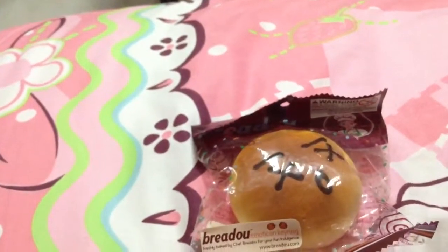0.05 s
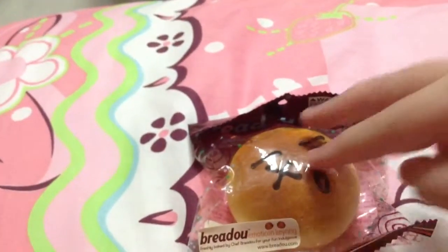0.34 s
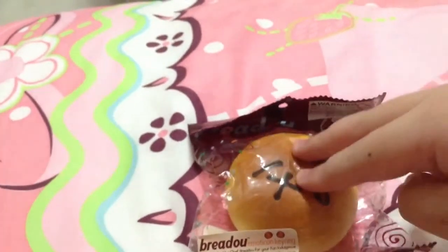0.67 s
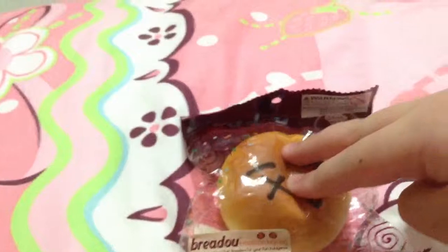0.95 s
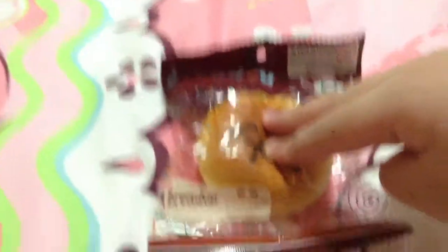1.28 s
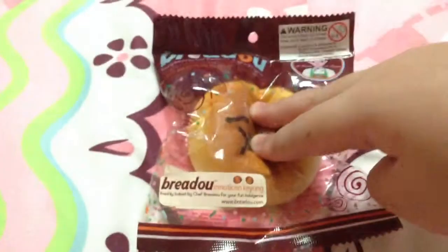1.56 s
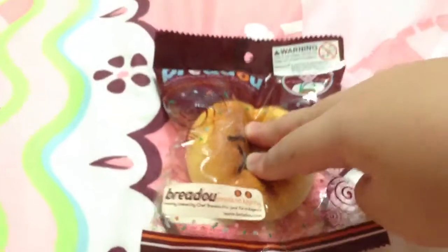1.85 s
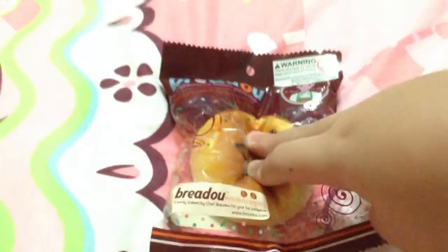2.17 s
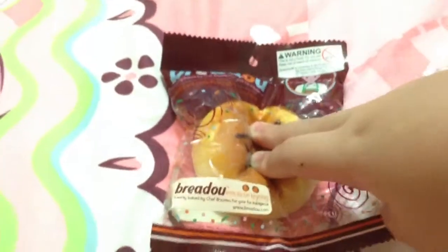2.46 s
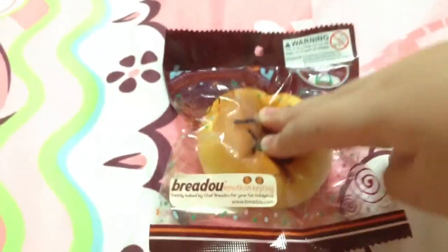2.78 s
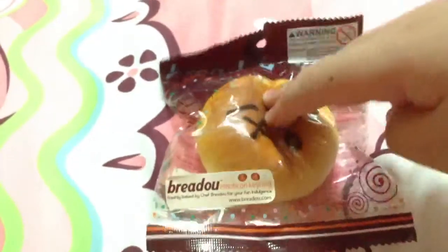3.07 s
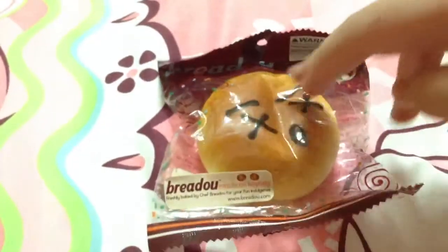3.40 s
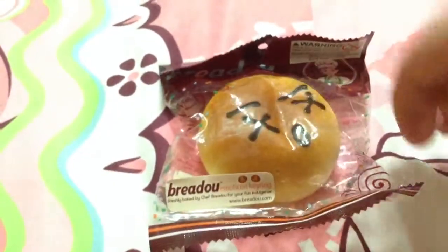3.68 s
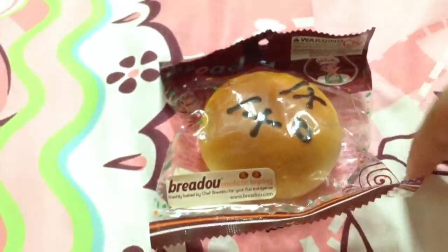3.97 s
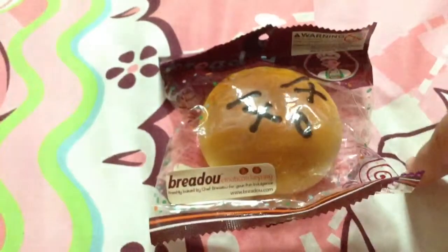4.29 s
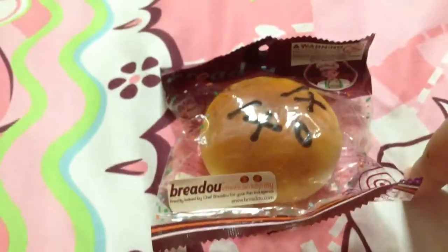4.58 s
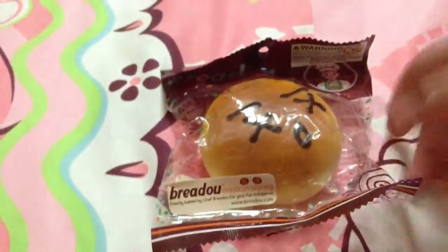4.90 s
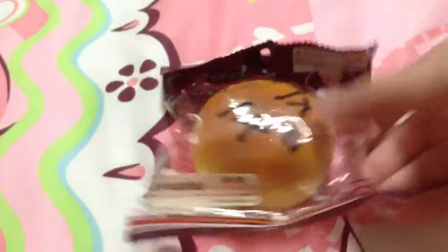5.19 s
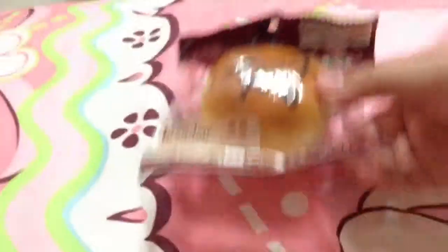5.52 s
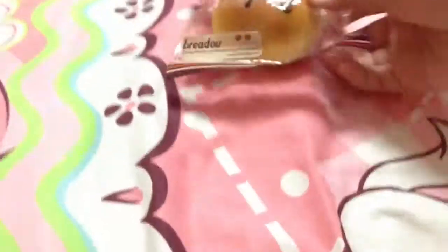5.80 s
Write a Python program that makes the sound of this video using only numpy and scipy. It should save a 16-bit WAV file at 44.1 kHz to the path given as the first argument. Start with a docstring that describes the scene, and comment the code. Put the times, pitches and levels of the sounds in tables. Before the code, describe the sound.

Close, sharp crackles and small thumps come from a plastic packet pressed and released around a soft toy, ending in a faint slide.

```python
"""Squeezing a foam toy in its packet

Fingers press a foam toy in its plastic packet on a cloth-covered table, let it swell back, then slide
the packet away. Creases in the film flip with sharp snaps among finer crackle, and broad panels pop
through with a soft thump. The film ticks as it peels from the foam, and the packet hisses over the
cloth. A small room echoes, and the loudest snaps overload the nearby microphone."""
import sys
import numpy as np
from scipy import signal
from scipy.fft import rfft, irfft
from scipy.io import wavfile
from scipy.ndimage import uniform_filter1d

SR = 44100
rng = np.random.default_rng(int(sys.argv[2]) if len(sys.argv) > 2 else 0)


def dump_mix(stems):
    """Bounce the given channels to the path in sys.argv[1] as a 16-bit WAV at rate SR."""
    frames = np.atleast_2d(stems).T  # one column per channel
    limited = np.clip(frames, -1, 1)  # hard clip at full scale
    pcm = np.round(limited * 32767).astype(np.int16)
    wavfile.write(sys.argv[1], SR, pcm)


N = 266805
TOP_HZ = 15450  # upper edge of the treble


def crease_snaps(crack_s=0.00024, rattle_s=0.0018, linger=0.04, linger_s=0.0057,
                 creak=0.21, creak_s=0.00022, ring_width=0.16, damping_hz=60, ripple_db=3, blur=0.43):
    """A crease creaks, cracks and leaves the film rattling. Returns the near sound and the room feed."""
    # One crease flipping: (time [s], level over 4 ms [dB], ring pitch [Hz], ring boost [dB], body [dB],
    # edge [dB], sheen [dB], share of the energy in the first crack [0-1], feed to the room [dB])
    flips = [(0.0518, -25.5, 1180, 14, -10, -6, -0.5, 0.95, -16.5),
             (0.1299, -27, 1520, 7.2, -9, -5, 3.5, 0.87, -21), (0.489, -50, 1260, 3, 14, 3, 19, 0.45, -13),
             (0.5906, -40.5, 2720, 16, 18, 28, 34, 0.75, -20), (0.667, -43, 2870, 9, 16, 1, 26, 0.7, -13),
             (0.857, -37, 3710, 11, 9.5, -23, -8.5, 0.5, -8),
             (0.8884, -38, 3900, 13, 10, -17, -10, 0.49, -9),
             (0.9136, -32, 720, 12, 3.5, -4, -11, 0.25, -19), (0.9424, -48.8, 970, 4, 3, -2, 7, 0.53, -13),
             (0.9654, -27, 2690, 20, 13.5, 11, 15, 0.53, -13),
             (0.9977, -22.5, 725, 6.6, -4.5, -1.5, -5.5, 0.23, -19.5),
             (1.0737, -27.5, 1050, 15, -2, -4, -3, 1, -16),
             (1.0979, -36, 2870, 15, 26, -1.5, 0.5, 0.33, -20),
             (1.146, -31, 5600, 8, 16.5, -9.5, -4, 0.51, -34),
             (1.1557, -34.5, 3880, 10, 20, -1, -0.5, 0.41, -15),
             (1.18, -44.5, 1190, 4.4, 20, -14, -12, 0.45, -15.5),
             (1.1875, -31.5, 790, 9, -7, -7, -11, 0.48, -23.5),
             (1.2096, -13.5, 1480, 10.5, -10.5, -1, 5.5, 0.88, -16),
             (1.2149, -20, 3600, 19.3, 13.5, 11, 12.5, 1, -15.5),
             (1.2424, -32, 3520, 14, 18, 3.5, 5.5, 0.45, -16.5),
             (1.2637, -21, 710, 16.3, -13.5, -11.5, -14, 0.81, -14.5),
             (1.2866, -34, 1140, 20, -21, -9, -16, 0.45, -17.5),
             (1.2931, -24.5, 3020, 12, 28.5, 14, 17, 0.39, -20),
             (1.3206, -21, 3520, 13, -4, 8, 21, 1, -18.5), (1.327, -16, 3280, 8.6, 0.5, 1.5, 4, 0.86, -32),
             (1.3548, -27, 5320, 8, 10.5, -5.5, -12, 0.32, -15),
             (1.3832, -24, 1320, 12, -8, 2, -1, 0.97, -17),
             (1.4025, -28.5, 3340, 12, 9, -8, -5.5, 0.51, -22),
             (1.4083, -27, 910, 10, 12, -2.5, 3.5, 0.37, -6),
             (1.4295, -15, 3270, 12, 10.5, -2, 0.5, 0.64, -22),
             (1.4541, -31, 2720, 12, 14, -1, 14, 0.72, -19),
             (1.4616, -16.5, 3020, 9.5, -1, -1, 4.5, 0.7, -27.5),
             (1.4709, -22, 2720, 7, -11, 0, 2, 0.21, -22.5),
             (1.4747, -15.5, 3250, 15, 16, 11.5, 15, 0.79, -12.5),
             (1.508, -24, 5570, 7.6, 8, -17, -12.5, 0.22, -11),
             (1.5614, -17.6, 716, 6, -24, 0.5, 4, 0.54, -6), (1.6398, -25, 1800, 5.3, 5, 0, -2, 0.83, -31),
             (1.6503, -24, 1640, 9, 3, -6, -4, 0.38, -20), (1.6658, -31, 2330, 5.8, 7, -3, -12, 0.45, -15),
             (1.6697, -28, 1640, 14, -8, -22, -14, 0.47, -19),
             (1.695, -33.5, 1630, 17, -8, 1, -17, 0.72, -9), (1.7158, -32, 2580, 12, 18, 3, -4, 0.83, -6),
             (1.7215, -21.5, 1400, 6.8, -11, -9, -15, 0.62, -27),
             (1.7343, -18, 1800, 12, -4, -3.5, -13.5, 0.45, -20.5),
             (1.7569, -27.0, 1700, 12, 8, 17, 1.5, 0.92, -18.5),
             (1.8177, -16.7, 1680, 3, 2.5, -6, -25, 0.5, -22),
             (1.8314, -32.5, 750, 10, 2, -6, -12.5, 0.53, -13.5),
             (1.8999, -29, 1900, 3, 8, -13.5, -23, 0.57, -28),
             (1.9197, -13.5, 5430, 5.7, 2, -10, -2, 0.84, -14.5),
             (1.9314, -23.5, 750, 4.8, 3, -6, -4.5, 0.57, -17.5),
             (1.9858, -26, 3520, 13, 16.5, 12, 8, 0.59, -17.5),
             (1.9927, -14.5, 2740, 13, 21, 13, 18, 1, -16.5),
             (2.0431, -15.0, 1600, 10.4, 8.5, 10, -3.5, 0.77, -22.5),
             (2.0785, -15, 3160, 13.6, 0, 9.5, 3, 1, -10),
             (2.1072, -27.5, 1700, 12, -25, -12, -26, 0.37, -11),
             (2.1586, -23, 1310, 11, -20, -15, -20, 0.46, -14.5),
             (2.1627, -17.5, 1630, 5.4, 4, 5.5, -0.5, 0.88, -23),
             (2.1746, -13, 3000, 9.9, 7, 5, 3, 0.9, -20),
             (2.1967, -16.5, 2000, 6.9, 3, -7, -4.5, 0.63, -10),
             (2.4647, -35.9, 1790, 19.6, 12.5, -18, -18, 0.8, -21),
             (2.5161, -37.5, 5600, 12, -17.5, -46, -33, 0.42, -15.5),
             (2.5292, -44, 2210, 12, -3, -23, -18, 0.44, -10),
             (2.566, -29.2, 1510, 15, -6, -40, -37, 0.35, -17),
             (2.5881, -16.0, 5440, 10, -1, -1, -1.5, 0.58, -20.5),
             (2.598, -34, 750, 13, -3.5, -20, -25, 0.31, -5.5),
             (2.6128, -16, 1860, 8.9, -8.5, -0.5, -8.5, 0.23, -23),
             (2.6601, -27.5, 1800, 12, 5, 9, -7, 0.79, -21.5),
             (2.6756, -20.5, 2020, 12, -1.5, -1.5, -13, 0.22, -25),
             (2.6914, -39.0, 1800, 8.3, 27, -1, 4, 0.45, -15),
             (2.6961, -31.5, 3180, 18, 11, 6, 7, 0.98, -23),
             (2.709, -18, 710, 17.4, -6, 7, 1.5, 0.92, -21.5),
             (2.7426, -32.5, 1120, 4.6, -2, -5.5, -23.5, 0.56, -18.5),
             (2.7551, -25.5, 3900, 3, 6, -7, -26, 0.8, -17),
             (2.7668, -28, 3700, 11, 7, -15.5, -28, 0.73, -18),
             (2.7704, -35, 3710, 6, 15, -17, -24.5, 0.41, -13),
             (2.7802, -33.5, 830, 11, 5, -14, -33, 0.68, -18.5),
             (2.79, -39, 2870, 14, 10, -12, -21, 0.67, -6), (2.8, -30.5, 2050, 11, 11, 5.5, -2, 0.61, -4.5),
             (2.8042, -17.5, 3520, 14.6, 12, -3, -5, 0.24, -18),
             (2.823, -15.5, 920, 11, -18, -2.5, -3, 0.47, -24),
             (2.8315, -24, 2780, 11, -1, -8, 2, 0.49, -14.5), (2.8367, -17, 2870, 6.2, 5, 1, 3, 0.63, -11),
             (2.8512, -23.5, 3340, 10, 15, -3.5, 4, 0.5, -16),
             (2.8609, -12.5, 4160, 5, 4, 5.5, 4, 0.9, -30), (2.8966, -17, 2530, 19, 16, 15, 17, 0.78, -18),
             (2.907, -29, 4330, 6.7, 12, 2.5, -1, 0.26, -10), (2.9161, -27, 3340, 13, 8, 4, 8, 0.74, -18.5),
             (2.9265, -32.8, 3710, 11, 14, 5, 2.5, 0.45, -16),
             (2.9498, -24.5, 3220, 13, 11, 2, -10, 0.29, -18),
             (2.9564, -17, 750, 10.3, 3, -3, -3, 0.6, -21),
             (2.9879, -18, 746, 11, -15, -15.5, -15, 0.26, -18.5),
             (2.9964, -27.5, 3500, 23, 19, 2, -4, 0.61, -21),
             (3.006, -19.5, 750, 5.7, -6.5, -2.5, -4.5, 0.56, -20),
             (3.0355, -31, 3180, 17, 19, 3, -11, 0.74, -9),
             (3.0509, -19.5, 1470, 4, 7.5, 4, 0.5, 0.4, -16.5),
             (3.0596, -15.5, 3400, 9.8, 7, -1, 2, 0.32, -28),
             (3.0981, -12.5, 3180, 10.3, -2, 6.5, 6.5, 0.9, -20),
             (3.1243, -32.4, 1630, 4.9, -3, 1, -4, 0.41, -7.5), (3.1335, -25, 3520, 5, 9, 5, 2, 0.82, -18),
             (3.155, -34, 746, 13, -5, -15, -11, 0.5, -17),
             (3.1942, -37.1, 3340, 14, 13, -6, -15, 0.35, -22),
             (3.2018, -24.5, 4330, 10.6, 6, 2, 7, 0.92, -32),
             (3.2358, -14.5, 3240, 17, 19.5, 14, 9.5, 0.7, -21.5),
             (3.256, -38.9, 2870, 13, 14, 2, -1, 0.45, -15),
             (3.287, -21, 4110, 8, 13, -4.5, 3.5, 0.72, -26.5),
             (3.358, -29, 4330, 3, 13, -14, -19, 0.58, -15),
             (3.3612, -21.5, 4560, 2.2, 14.5, -5, -8, 0.48, -21.5),
             (3.3782, -29.5, 1630, 5, 5, -2.5, -9, 0.71, -26),
             (3.3999, -17, 3000, 8.7, 1, -7.5, -6, 0.77, -16), (3.557, -35, 755, 3, -1, 5.5, 21, 0.66, -16),
             (3.5848, -47.5, 2580, 7, 5, 5, 22, 0.73, -8), (3.62, -48.5, 2580, 10, 21, 8, 15, 0.92, -17),
             (3.6442, -45.5, 1260, 3, 3, -1, 15, 0.82, -13.5),
             (3.6823, -30.2, 3280, 5.6, -2, -21.5, -14.5, 0.5, -3),
             (3.6935, -14.5, 3020, 10, -7.5, -15.5, -11.5, 0.88, -30),
             (3.7804, -21.5, 1380, 13.4, -11.5, 3.5, 0, 0.75, -23.5),
             (3.9582, -25, 3470, 19.4, 23, 13, 6, 0.35, -15),
             (3.9598, -19.0, 1140, 15, 6.5, 2.5, 1, 0.41, -19.5),
             (3.9865, -33.5, 750, 5, 3, -13, -21, 0.57, -12.5),
             (3.9981, -10, 3500, 9.5, -1, 9.5, 11, 0.94, -17.5),
             (4.0761, -21.5, 1300, 9.1, -10, -6.5, -16, 0.82, -21.5),
             (4.1925, -29, 800, 17, -7, -14, -17, 0.68, -14),
             (4.1984, -20.5, 3740, 16, 14.5, 1.5, -1, 0.18, -18),
             (4.2621, -16, 3300, 6.2, 10, 3, 2.5, 0.65, -17.5),
             (4.3306, -41.1, 2100, 4, -2, -11, -12, 0.46, -21),
             (4.534, -48.5, 2720, 13, 10, 6, 20, 0.45, -13),
             (5.1383, -25, 1170, 15.3, -7, -3, 0, 0.74, -17), (5.2554, -35.5, 1900, 4, 11, 2, 9, 0.53, -9),
             (5.2873, -17.5, 3200, 11.3, 8, 19.5, 13, 0.76, -14),
             (5.3658, -32.0, 5000, 14, -1, -10.5, -12, 0.57, -14),
             (5.396, -17.5, 3450, 15.4, -7, 10, 11.5, 0.83, -18),
             (5.3984, -22, 3740, 10, -9, -2, 3, 0.18, -25),
             (5.5354, -51.6, 1320, 11, 11, -12, -8, 0.54, -6),
             (5.5789, -25, 3560, 10, 4.5, 6.5, 6, 0.25, -15.5),
             (5.8304, -43.5, 1080, 9, -11, -16, -21, 0.63, -8),
             (5.8631, -42.3, 1800, 18, -15, -13, -14, 0.44, -22),
             (6.0339, -40.5, 3630, 13, 5, 5, -2, 0.63, -7)]
    # Where body, middle (held at 0 dB), edge and sheen lie: (frequency [Hz])
    tone_hz = [1000, 2700, 6500, 12000]
    # How well the film gives off sound: (frequency [Hz], gain [dB])
    film_tone = [(40, -37), (110, -38), (190, -7), (450, -9), (750, 0.5), (15000, 0)]
    size, lead, level_span = 1024, 88, 176  # in samples
    t = (np.arange(size) - lead) / SR
    hz = np.fft.rfftfreq(size, 1 / SR)
    age = abs(t)
    crack = unit((t >= 0) * np.exp(-age / crack_s))
    dying_away = np.exp(-age / rattle_s) + linger * np.exp(-age / linger_s)
    rattle = unit(np.where(t < 0, creak * np.exp(-age / creak_s), dying_away))
    near, far = np.zeros((2, N))
    for s, db, ring_hz, ring_db, body_db, edge_db, sheen_db, share, room_db in flips:
        share = np.clip(share, 0.05, 0.95)
        envelope = np.sqrt(share * crack ** 2 + (1 - share) * rattle ** 2)
        burst = rfft(rng.standard_normal(size) * envelope)
        # Even out the burst, so that the ringing patch of film sets the tone.
        uneven_db = 10 * np.log10(uniform_filter1d(abs(burst) ** 2, size=25))
        tone_db = at_hz(list(zip(tone_hz, [body_db, 0, edge_db, sheen_db])), hz)
        patch_db = ring_db / (1 + ((hz - ring_hz) / (ring_width * ring_hz + damping_hz)) ** 2)
        colour_db = at_hz(film_tone, hz) + tone_db + patch_db - uneven_db
        # Sound from two parts of the film adds and cancels, rippling each snap's treble differently.
        lag_s, phase = rng.uniform(0.00015, 0.0005), rng.random()
        comb_db = ripple_db * np.minimum(hz / tone_hz[2], 1) * np.cos(2 * np.pi * (hz * lag_s + phase))
        direct = unit(irfft(burst * ringing_filter(colour_db + comb_db)))
        # The room gathers sound from all directions, which softens the ring.
        scattered = unit(irfft(burst * ringing_filter(colour_db - blur * patch_db)))
        gain = amp(db) * np.sqrt(level_span / size)
        add(near, s + t[0], gain * direct)
        add(far, s + t[0], gain * amp(room_db) * scattered)
    return near, far


def panel_pops(rise_s=0.0001, bass_cut_hz=160, leak_db=-24):
    """A panel pushes the air once; the microphone's bass cut turns most of that into a brief swing."""
    # A broad panel of film popping through: (time [s], strength of the push [dB], fade time [s])
    panels = [(1.295, -23.5, 0.00077), (1.402, -25.5, 0.0011), (1.4298, -12, 0.00088),
              (1.4531, -20, 0.0012), (1.4707, -21, 0.0012), (1.4748, -4, .0012), (1.5076, -9.5, 0.00085),
              (1.562, -4, 0.0017), (1.8171, -16, 0.00057), (1.9202, -5, .0015), (1.9316, -10.5, 0.0014),
              (1.9923, -5, 0.0012), (2.0792, -15.5, 0.0012), (2.1747, -2.5, .0015), (2.196, -13.5, .001),
              (2.8079, -23, 0.0015), (2.851, -19.5, 0.0013), (2.864, -23.5, .001), (2.9568, -21, .001),
              (3.0049, -21, .003), (3.0109, -19.5, .003), (3.0604, -15, 0.00086), (3.1391, -19, 0.00096),
              (3.162, -23, 0.0012), (3.2362, -1.5, 0.0016), (3.2874, -9.5, 0.0013), (3.361, -1, 0.0011),
              (3.9992, -21, 0.0018), (5.2862, -32, 0.0044)]
    t = np.arange(1024) / SR
    pushes = np.zeros(N)
    for s, db, fade_s in panels:
        add(pushes, s, amp(db) * np.exp(-t / fade_s) * (1 - np.exp(-t / rise_s)))
    bass_cut = signal.butter(4, bass_cut_hz, "high", fs=SR, output="sos")
    return signal.sosfilt(bass_cut, pushes) + amp(leak_db) * pushes


def fine_crackle(per_s=200, spread_db=6, decay_s=0.001, scratch_mix=0.78, level_db=-2,
                 stiffness=0.74, firm_db=-46, clump=0.8, pitches=28):
    """Many tiny creases flip; a light touch favours the smallest, highest-pitched patches of film."""
    # How hard the fingers work the film: (time [s], strength [dB])
    effort = [(0, -80), (.45, -70), (.52, -64), (.8, -64), (.9, -53), (1.1, -52), (1.25, -44), (1.45, -42),
              (1.55, -52), (1.68, -45), (1.79, -61), (1.88, -56), (2.0, -56), (2.15, -51), (2.25, -78),
              (2.5, -63), (2.64, -43), (2.8, -44.5), (3.0, -47), (3.15, -61), (3.3, -50), (3.55, -60),
              (3.85, -57), (3.95, -74.5), (4.3, -59), (4.5, -63.5), (4.7, -77), (5.1, -61), (5.4, -63),
              (5.55, -82), (6.05, -54)]
    effort_db = curves(effort)[0]
    # One crease sets off its neighbours, so they come in flurries.
    flurry = np.exp(clump * wobble(500))
    strengths = amp(spread_db * np.minimum(rng.exponential(1, N), 2))
    kicks = unit(strengths * (rng.random(N) < flurry * per_s / SR))
    pitch_index = rng.integers(0, pitches, N)
    t = np.arange(400) / SR
    crackle = np.zeros(N)
    for k, hz in enumerate(np.geomspace(750, 14000, pitches)):
        fade = np.exp(-t / decay_s * np.sqrt(hz / 2000))
        ring = unit(np.sin(2 * np.pi * hz * t) * fade)
        scratch = unit(np.diff(rng.standard_normal(len(t) + 1)) * fade)
        click = unit(ring + scratch_mix * scratch) / np.sqrt(len(t))
        light_touch_db = stiffness * np.minimum(effort_db - firm_db, 0) * (1 - k / pitches)
        crackle += signal.oaconvolve(kicks * (pitch_index == k) * amp(light_touch_db), click)[:N]
    return amp(effort_db + level_db) * crackle


def peeling_ticks(per_s=220, spread_db=6, decay_s=0.0004, low_hz=7500):
    """Tiny spots of film let go of the foam one by one, each with a very short, high tick."""
    # The clinging film coming away: (time [s], level [dB])
    peel_levels = [(0, -69), (.15, -72), (.22, -90), (.45, -95), (.48, -66), (.58, -62), (.63, -70),
                   (.67, -66), (.72, -69), (.82, -65.5), (.9, -57), (1.15, -55), (1.8, -66), (2.3, -84),
                   (2.5, -71.5), (3.3, -53), (3.55, -57), (3.65, -58.5), (3.75, -60), (3.82, -59),
                   (3.9, -62.5), (4.1, -64), (4.4, -73), (4.65, -90)]
    strengths = amp(spread_db * np.minimum(rng.exponential(1, N), 2.5))
    releases = strengths * (rng.random(N) < per_s / SR)
    fades = signal.lfilter([1], [1, -np.exp(-1 / (decay_s * SR))], releases)
    ticks = fades * rng.standard_normal(N)
    treble_band = signal.butter(2, [low_hz, TOP_HZ], "band", fs=SR)
    return amp(curves(peel_levels)[0]) * unit(signal.lfilter(*treble_band, ticks))


def sliding_packet(grip_db=0.25):
    """Film dragged over cloth hisses, catching unevenly; the weight of the hand adds a lower rub."""
    # The packet moving on the cloth: (time [s], hiss level [dB], rub compared with hiss [dB])
    slide_levels = [(0, -56.5, -8), (.2, -74, -10), (.45, -69, -12), (.55, -67, -16), (.8, -63, -6),
                    (.95, -49.5, -6.5), (1.15, -66, 2), (1.3, -38.5, -9), (1.5, -67, -20), (1.75, -60, 1),
                    (2.4, -66, -13), (2.7, -61, 0), (3.1, -49.5, 1), (3.55, -68.5, -36), (3.9, -62.5, -6),
                    (4.4, -68.5, -7), (4.6, -70, -3), (4.75, -68, -7), (4.82, -53.5, -12.5),
                    (4.91, -53.5, -9), (4.95, -65.5, -0.5), (5.02, -46, -12), (5.08, -49.5, -7),
                    (5.2, -44, -12.5), (5.3, -49, -9), (5.42, -46.5, -20), (5.5, -65, -16),
                    (5.56, -69, -10), (5.63, -51, -29), (5.8, -51, -16), (5.95, -50.5, -22),
                    (6.05, -47.5, -18)]
    # The bright hiss of the weave: (frequency [Hz], relative level [dB])
    cloth_tone = [(1500, -29), (2800, -9.5), (3600, -7.5), (5200, -7), (6500, -8), (9000, -4), (12000, -1),
                  (15000, -3)]
    # The lower rub under the hand: (frequency [Hz], relative level [dB])
    rub_tone = [(300, -17), (600, -1), (1200, -0.5), (2100, -2), (2900, -16.5), (6000, -21)]
    hiss_db, weight_db = curves(slide_levels)
    catching_db = grip_db * wobble(300)
    return amp(hiss_db + catching_db) * (hiss(cloth_tone) + amp(weight_db) * hiss(rub_tone))


def room_echo(sound, gap_s=0.01, early_db=-6, density=0.15, tails=3, blend_hz=3.5):
    """Dense echoes, weaker at first. A shifting blend of tails stands for snaps in different places."""
    # The tone of the echoes: (frequency [Hz], relative level [dB])
    echo_tone = [(150, -13.5), (400, -10.5), (1000, -1.5), (2400, 5.5), (4500, 3), (6500, 0), (10000, -2),
                 (15000, 2.5)]
    # How long the room rings: (frequency [Hz], time to fade by 60 dB [s])
    fade_times = [(300, 0.15), (1200, 0.25), (3000, 0.3), (8000, 0.38), (15000, 0.29)]
    t = np.arange(SR * 3 // 4) / SR
    onset = np.where(t > gap_s, 1, amp(early_db))
    echo = np.zeros(N)
    for k in range(tails):
        bounces = rng.standard_normal(len(t)) * (rng.random(len(t)) < density) * onset
        hz, age, bands = signal.stft(bounces, SR, nperseg=256)
        fade_db = 60 * age / at_hz(fade_times, hz)[:, None]
        tail = signal.istft(bands * amp(at_hz(echo_tone, hz)[:, None] - fade_db), SR, nperseg=256)[1]
        blend = np.cos(2 * np.pi * blend_hz * np.arange(N) / SR + np.pi * k / tails) * np.sqrt(2 / tails)
        echo += signal.oaconvolve(sound * blend, tail / np.linalg.norm(tail))[:N]
    return echo


def still_room(air_db=-60):
    """Soft air noise with a faint hum from the mains electricity."""
    # The air in the room: (frequency [Hz], relative level [dB])
    air_tone = [(18, -85), (30, -62), (86, -35), (194, -4.5), (266, -7.5), (295, 0), (437, -8.5),
                (569, -8.5), (616, -12.5), (1160, -18.5), (1320, -21.5), (1430, -18.5), (3490, -29),
                (14400, -39), (16000, -46)]
    # The tones of the mains hum: (frequency [Hz], level [dB])
    hum_tones = [(100, -83.5), (200, -76), (300, -73)]
    t = np.arange(N) / SR
    hum = sum(amp(db) * unit(np.sin(2 * np.pi * (hz * t + rng.random()))) for hz, db in hum_tones)
    return amp(air_db) * hiss(air_tone) + hum


def amp(db):
    """Turns decibels into a number to multiply by."""
    return 10 ** (np.asarray(db) / 20)


def unit(x):
    """Scales a signal to an average (rms) size of 1."""
    return x / np.sqrt(np.mean(x ** 2) + 1e-20)


def at_hz(points, hz):
    """Reads between the rows of a frequency table, with octaves evenly spaced."""
    row_hz, values = np.transpose(points)
    return np.interp(np.log(hz + 1), np.log(row_hz), values)


def curves(rows):
    """Draws each column of a time table as a curve with a value at every sample."""
    times, *columns = np.transpose(rows)
    return [np.interp(np.arange(N) / SR, times, column) for column in columns]


def add(mix, s, sound):
    """Mixes a sound in, starting at s seconds."""
    part = mix[max(round(s * SR), 0):][:len(sound)]
    part += sound[:len(part)]


def wobble(samples):
    """A random wavering: noise smoothed over this many samples."""
    return unit(uniform_filter1d(rng.standard_normal(N), samples))


def hiss(tone):
    """Steady noise shaped by a table of frequencies and levels."""
    gains = amp(at_hz(tone, np.fft.rfftfreq(N, 1 / SR)))
    return unit(irfft(rfft(rng.standard_normal(N)) * gains, N))


def ringing_filter(db):
    """A filter with these gains that rings only after it is struck, never before."""
    log_gain = np.log(amp(np.r_[db, db[-2:0:-1]]))
    return np.exp(np.conj(signal.hilbert(log_gain)))[:len(db)]


def scene(echo_db=1, fine_feed_db=-10, pop_feed_db=-14):
    """The packet close by, its echoes and the still room, in one channel."""
    snaps, snap_feed = crease_snaps()
    fine = fine_crackle() + peeling_ticks()
    thumps = panel_pops()
    echo = room_echo(snap_feed + amp(fine_feed_db) * fine + amp(pop_feed_db) * thumps)
    return (snaps + fine + thumps + sliding_packet() + amp(echo_db) * echo + still_room())[None]


def record(dry, ceiling=0.96):
    """The overloaded microphone rounds off the tallest peaks; then the highest treble is cut."""
    rounded = dry / (1 + (dry / ceiling) ** 6) ** (1 / 6)
    treble_cut = signal.firwin(401, TOP_HZ, window=("kaiser", 9), fs=SR)
    return signal.oaconvolve(rounded, treble_cut[None], "same")


dry = scene()
out = record(dry)
dump_mix(out)
```